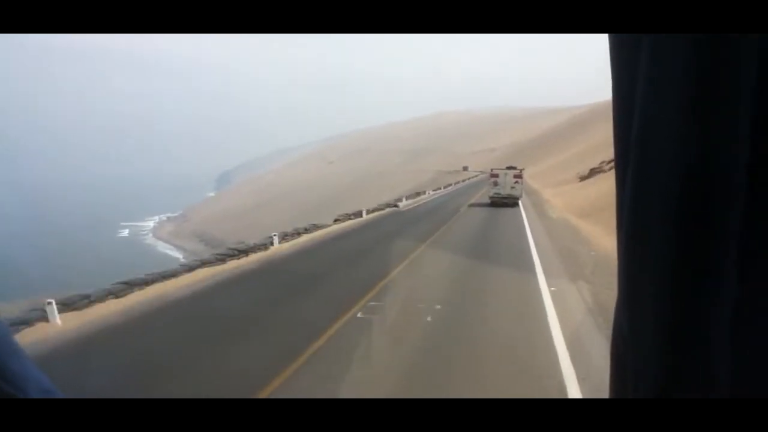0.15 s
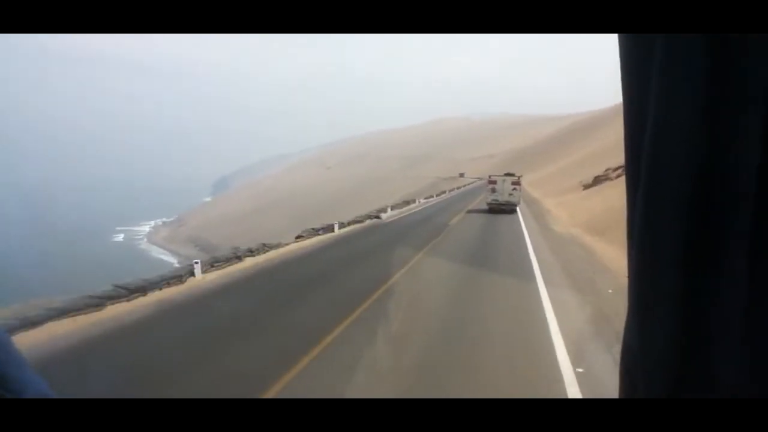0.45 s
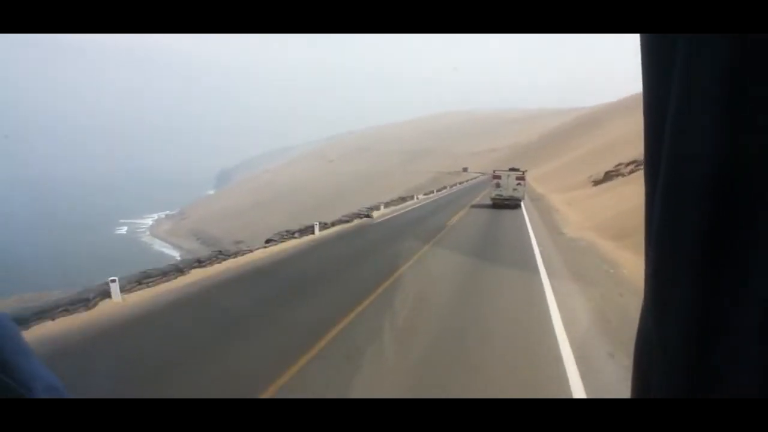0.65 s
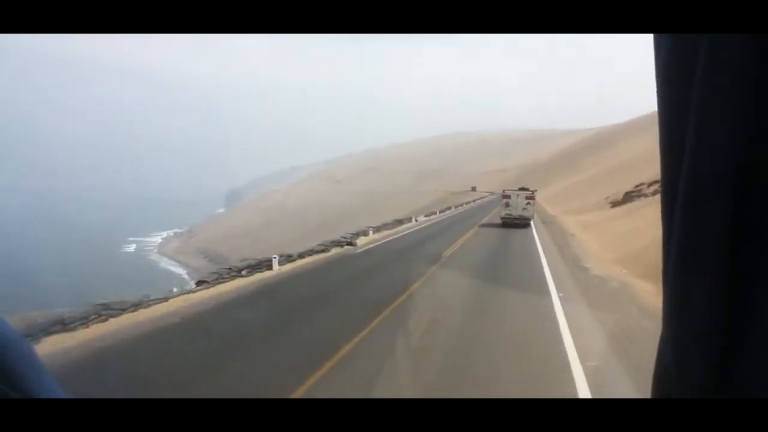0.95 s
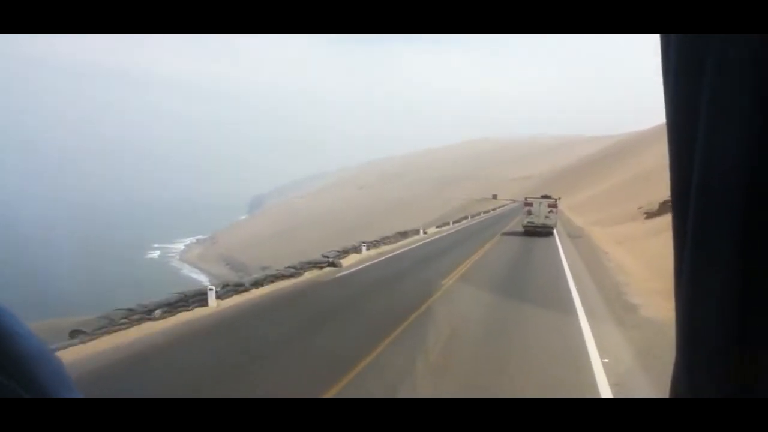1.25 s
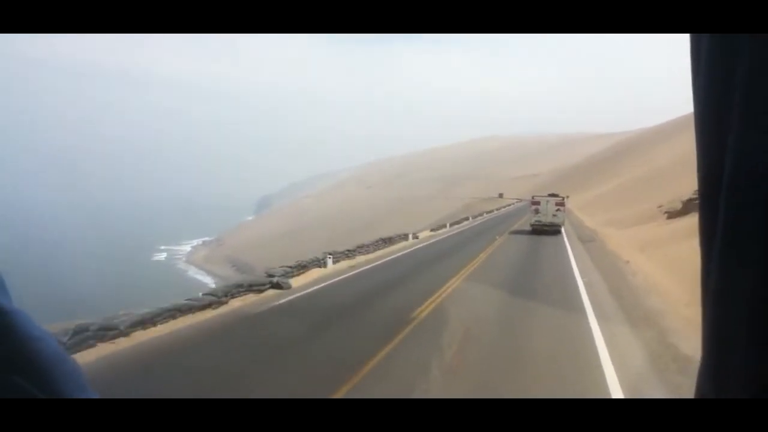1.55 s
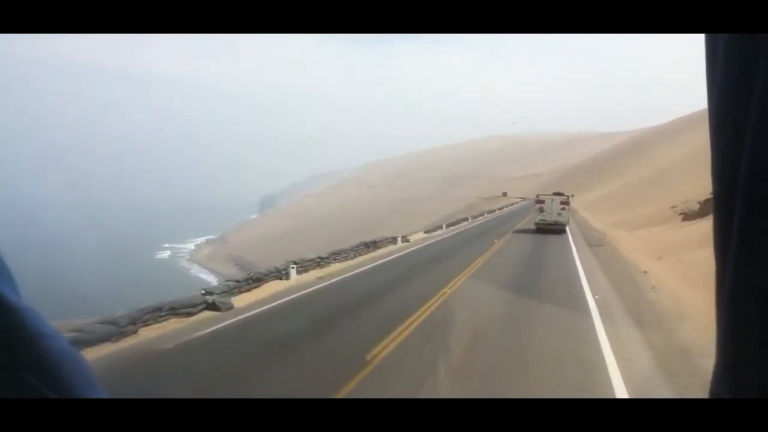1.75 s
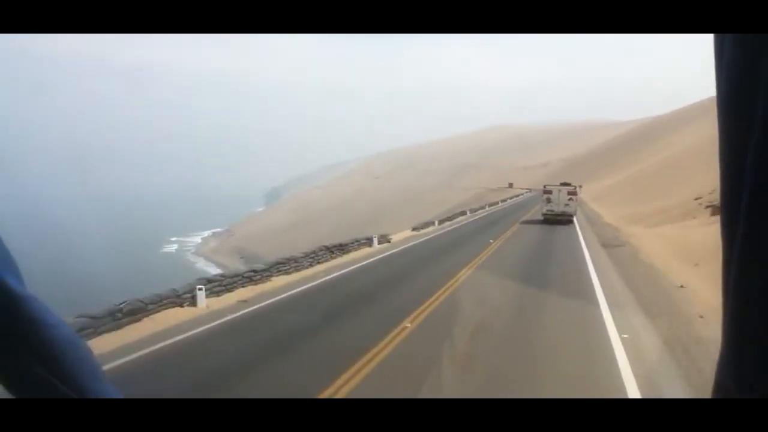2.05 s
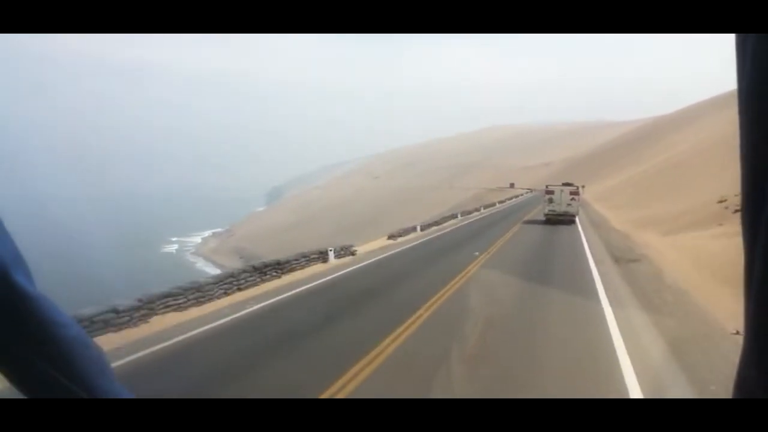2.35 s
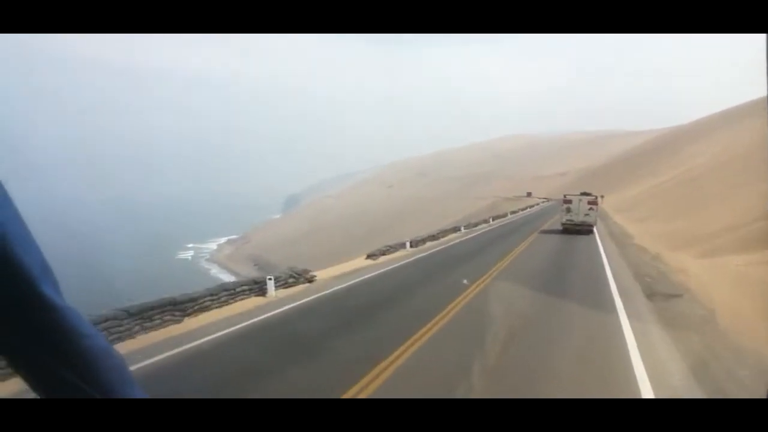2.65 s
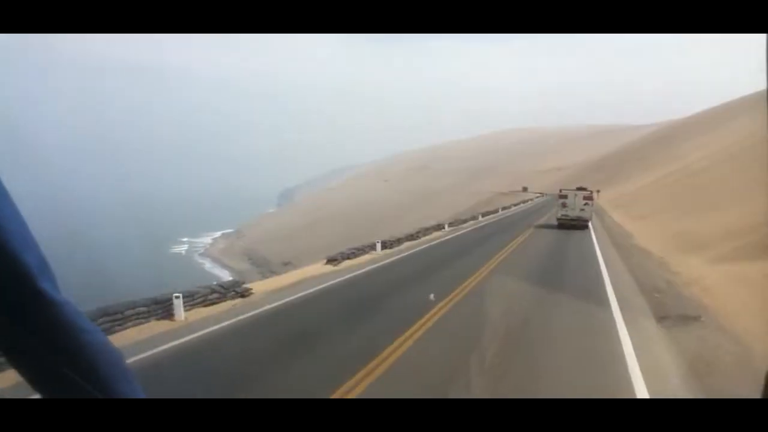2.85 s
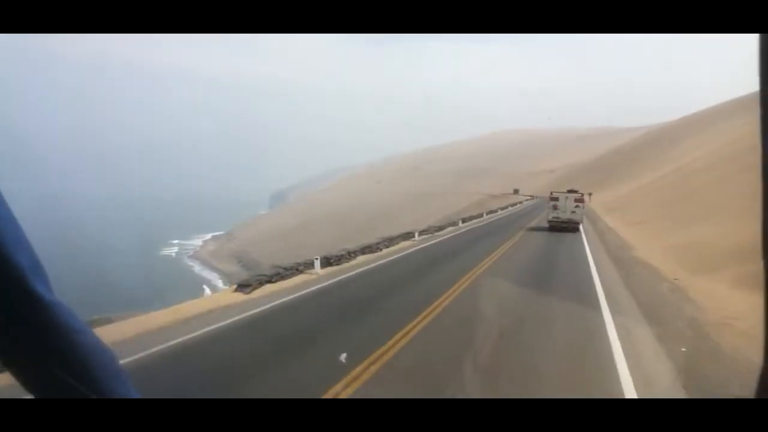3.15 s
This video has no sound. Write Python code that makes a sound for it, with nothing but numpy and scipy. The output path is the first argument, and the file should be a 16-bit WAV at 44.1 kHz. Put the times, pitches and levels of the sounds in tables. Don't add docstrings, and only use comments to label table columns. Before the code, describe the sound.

Inside a coach at steady speed, the floor drums and booms unevenly over rough asphalt. Quiet diesel drone and thin wind hiss sit behind, while sharp little rattles come and go, captured by one cabin microphone.

```python
import sys
import numpy as np
from scipy import signal
from scipy.fft import rfft, irfft, next_fast_len
from scipy.io import wavfile
from scipy.ndimage import uniform_filter1d, map_coordinates

SR = 44100
rng = np.random.default_rng(int(sys.argv[2]) if len(sys.argv) > 2 else 0)


def file_out(sig):
    cols = np.atleast_2d(sig).T
    lim = np.clip(cols, -1, 1)
    pcm = np.round(lim * 32767).astype(np.int16)
    wavfile.write(sys.argv[1], SR, pcm)


def voltage_ratio(decibels):
    exponent = np.asarray(decibels, float) / 20
    return 10 ** exponent


N = 145530


def unit(x):
    return x / np.sqrt(np.mean(x ** 2) + 1e-20)


def curve(points):
    return np.interp(np.arange(N) / SR, *np.transpose(points))


def shape(points):
    freq_hz, level_db = np.transpose(points)
    return lambda hz: voltage_ratio(np.interp(np.log(hz + 1), np.log(freq_hz + 1), level_db))


def ringing(modes):
    def response(hz):
        total = 0
        for k, (centre, width, db) in enumerate(modes):
            damping = 1j * hz * width
            total = total + (-1) ** k * voltage_ratio(db) * damping / (centre * centre - hz * hz + damping)
        return total
    return response


def filtered(x, response):
    size = next_fast_len(len(x) + 8192)
    return irfft(rfft(x, size) * response(np.fft.rfftfreq(size, 1 / SR)), size)[:len(x)]


def wobble(rate):
    knots = rng.standard_normal(int(N * rate / SR) + 4)
    return map_coordinates(knots, [np.arange(N) * rate / SR])


def rush(response, patchy_db):
    spectra = signal.stft(rng.standard_normal(N + 512), nperseg=512)[2]
    patches = uniform_filter1d(rng.standard_normal(spectra.shape), size=6, axis=0)
    patches = unit(uniform_filter1d(patches, size=10, axis=1))
    noise = signal.istft(spectra * voltage_ratio(patchy_db * patches), nperseg=512)[1][:N]
    return unit(filtered(noise, response))


# freq_hz, level_db (per Hz)
WIND_COLOUR = [(1470, -7), (2500, -14.5), (3960, -3), (4300, -3.5), (7230, -7), (10500, -11),
               (12600, -14.5), (16400, -53), (22000, -120)]
# start_s, level_db
WIND_GUSTS = [(0.0, -58.5), (0.19, -61), (0.74, -60), (0.95, -57.5), (1.07, -60), (1.76, -62),
              (2.12, -59.5), (3.3, -61)]
# start_s, level_db
FAINT_RING = [(0, -69), (1.5, -72), (2, -67), (3.3, -90)]


def wind():
    ring_noise = rush(ringing([(3850, 220, 0)]), patchy_db=0.5)
    ring_level_db = curve(FAINT_RING) + 3 * wobble(24.65)
    gust_db = curve(WIND_GUSTS)
    hiss_db = -58.5 + gust_db - gust_db.mean() + 0.41 * wobble(6.06)
    return voltage_ratio(hiss_db) * rush(shape(WIND_COLOUR), patchy_db=1.2) + voltage_ratio(ring_level_db) * ring_noise


def orders(base_hz, table, drift, flutter_db):
    phase = 2 * np.pi * np.cumsum(base_hz * (1 + drift * wobble(6))) / SR
    total = np.zeros(N)
    for order, rms_db in table:
        total += np.sqrt(2) * voltage_ratio(rms_db + flutter_db * wobble(9.09)) * np.sin(order * phase)
    return total


# order (multiple of the firing rate), level_db (rms)
FIRING_ORDERS = [(1, -36), (2, -43), (3, -43.5)]
# order (multiple of its rotation), level_db (rms)
DRIVELINE_ORDERS = [(1, -40), (2, -46.5), (3, -65)]


def engine():
    hum = orders(234.9, DRIVELINE_ORDERS, drift=0.005, flutter_db=1.5)
    return orders(70.37, FIRING_ORDERS, drift=0.04, flutter_db=3) + hum


# freq_hz, level_db
TRIM_COLOUR = [(700, -24), (1500, -9), (2500, 0.5), (4000, -1.5), (5500, 0.5), (8000, -4), (10500, -3.5),
               (13000, -12)]
# freq_hz, width_hz, level_db
KNOCKED_PANEL = [(1370, 580, 6.5), (2000, 1170, 8.5), (3170, 1350, -1)]


def contact(envelope, ring_hz, knock_db, air_db=0):
    count = len(envelope)
    noise = rng.standard_normal(count)
    unevenness = np.repeat(rng.standard_normal(count), 40)[:count]
    grit = unit(noise * voltage_ratio(2 * unevenness))
    ring = ringing([(ring_hz, 0.18 * ring_hz, 0)])
    panel = ringing(KNOCKED_PANEL)

    def response(hz):
        trim = shape(TRIM_COLOUR)(hz) * (1.08 * voltage_ratio(air_db) + 1.69 * np.abs(ring(hz)))
        return trim + voltage_ratio(knock_db + 9) * panel(hz)
    return filtered(envelope * grit, response)


# start_s, level_db (peak), ring_hz, knock_db (panel), decay_s (dying chatter)
TRIM_TICKS = [(0.063, -31, 5100, -5, 0.01), (0.1293, -40, 3750, -2, 0.009), (0.1976, -42, 3820, 0, 0.009),
              (0.2982, -39.5, 3770, -10, 0.0076), (0.5003, -38, 3760, -2, 0.009),
              (0.5324, -35, 6920, -11, 0.01), (0.5646, -39, 3770, -2, 0.009), (0.83, -40, 3900, -11, 0.009),
              (0.8954, -30, 5650, -12, 0.0077), (0.9036, -27.5, 3700, -4.5, 0.0093),
              (1.0284, -33, 9800, -6, 0.014), (1.0288, -34, 3900, -1.5, 0.0099),
              (1.288, -39, 5600, -21, 0.009), (1.935, -35.5, 5790, -9, 0.012),
              (1.9752, -33, 5570, -3.5, 0.0084), (2.4437, -36, 6000, -32, 0.009),
              (2.453, -27, 5450, -2.5, 0.007), (2.468, -56, 4120, -13, 0.009),
              (2.6445, -40, 3850, -3.5, 0.009), (2.826, -37.5, 5800, -10, 0.006),
              (2.9972, -28.5, 5660, -2, 0.0068), (1.3314, -44, 3800, -5, .009)]


def ticks(t):
    out = np.zeros(N + SR)
    tiny = [(u * N / SR, -56 - 1.2 * np.log(v), 3000 + 4000 * w, -6, 0.006) for u, v, w in rng.random((60, 3))]
    for start_s, db, ring_hz, knock_db, decay_s in list(TRIM_TICKS) + tiny:
        dying = np.exp(-t / 0.0015) + voltage_ratio(3) * np.exp(-t / decay_s)
        envelope = dying * (1 - np.exp(-t / 0.00057))
        air_db = 0.48 * min(db + 32, 0)
        out[round(start_s * SR):][:len(t)] += voltage_ratio(db - 12.5) * contact(envelope, ring_hz, knock_db, air_db)
    return out


# middle_s, level_db, half_length_s, ring_hz, knock_db (panel)
TRIM_CHATTERS = [(0.024, -61, .018, 6000, -11), (0.372, -56, 0.018, 5000, -10),
                 (0.398, -56, 0.011, 5000, -6), (0.785, -56, 0.0092, 6000, -6),
                 (.872, -60, 0.0098, 6000, -9), (0.902, -47, 0.0078, 4970, 0),
                 (0.951, -53.5, 0.021, 6070, -16), (1.071, -39.5, 0.0057, 7540, -9),
                 (1.081, -51, 0.013, 4500, -4), (2.447, -61, .004, 6000, -8.5),
                 (1.338, -50.5, 0.0086, 9300, 1), (1.473, -58, .012, 7000, -11),
                 (1.072, -47, 0.0061, 3900, -8), (1.46, -57, 0.011, 3600, 8.5),
                 (2.451, -49.5, 0.0063, 5500, -2), (2.21, -75, .1, 7000, -10),
                 (2.905, -54.5, .01, 9550, -11)]


def chatters(t):
    out = np.zeros(N + SR)
    for middle_s, db, half_s, ring_hz, knock_db in TRIM_CHATTERS:
        begin_s = max(middle_s - t[-1] / 2, 0)
        swell = np.exp(-((t + begin_s - middle_s) / half_s) ** 2 / 2)
        out[round(begin_s * SR):][:len(t)] += voltage_ratio(db) * contact(swell, ring_hz, knock_db)
    return out


# start_s, level_db
LOCKER_KNOCKS = [(.9035, -30), (2.454, -36.5), (.064, -35), (2.998, -39), (1.3, -43), (1.334, -34),
                 (.385, -37.5), (0.62, -42)]
# freq_hz, level_db, t60_s
LOCKER_MODES = [(840, 1, 0.053), (1120, 3.5, 0.033), (1744, -7.5, 0.044), (2530, -10, 0.037),
                (3700, -8, 0.025)]


def locker(t):
    out = np.zeros(N + SR)
    for start_s, db in LOCKER_KNOCKS:
        ring = np.zeros(len(t))
        for hz, level_db, t60_s in LOCKER_MODES:
            ring += voltage_ratio(level_db + rng.normal(0, 1.3) - 60 * t / t60_s) * np.sin(2 * np.pi * hz * t)
        out[round(start_s * SR):][:len(t)] += voltage_ratio(db) * ring * (1 - np.exp(-t / 0.00046))
    return out


def rattles():
    t = np.arange(SR // 10) / SR
    return (ticks(t) + chatters(t) + locker(t))[:N]


def cabin(x):
    t = np.arange(SR // 4) / SR
    tail = rng.standard_normal(len(t)) * voltage_ratio(-60 * t / 0.084) * (t > 0.003)
    return x + voltage_ratio(-9.5) * signal.fftconvolve(x, tail / np.linalg.norm(tail))[:N]


# start_s, level_db
ROAD_LEVEL = [(0, -24.5), (.5, -27.5), (.9, -24.5), (1.35, -27.5), (1.6, -27.5), (1.8, -25), (1.88, -23.5),
              (2, -29), (2.2, -23.5), (2.55, -28), (2.65, -25), (3.05, -28), (3.3, -26.5)]
# freq_hz, level_db (per Hz)
TYRE_COLOUR = [(150, -56), (260, -12), (330, -5), (520, -8), (700, -11.5), (760, -13.5), (1500, -21),
               (3500, -35.5), (5000, -51)]


def tyres():
    level_db = curve(ROAD_LEVEL)
    roar_db = -38 + 0.26 * (level_db - level_db.mean()) + 0.26 * wobble(7.1)
    return voltage_ratio(roar_db) * rush(shape(TYRE_COLOUR), patchy_db=0.7)


# freq_hz, level_db (per Hz)
FLOOR_BOOM = [(12, -34), (20, -10.5), (81, 0.5), (189, -8), (226, -9), (300, -18.5), (390, -70),
              (660, -120)]
# freq_hz, level_db
THUMP_GAP = [(45, -0.5), (62, -8), (115, -7), (150, -1), (200, -1.5), (280, -2)]
# freq_hz, width_hz, level_db
FLOOR_PANELS = [(42.4, 8.9, -1.5), (97.5, 20, -0.5), (128.8, 10.8, 2), (170.3, 13.2, -3),
                (212.8, 14.5, -3.5), (261.3, 10.7, 0)]


def floor():
    def response(hz):
        return shape(FLOOR_BOOM)(hz) * shape(THUMP_GAP)(hz) * (0.5 + np.abs(ringing(FLOOR_PANELS)(hz)))
    return voltage_ratio(curve(ROAD_LEVEL) - 2.5) * rush(response, patchy_db=-0.23)


# middle_s, level_db
# (peak), # ring_hz
ROAD_BUMPS = [(0, -21.5, 80), (0.085, -23, 74), (0.132, -21, 102), (0.227, -24.5, 77), (0.283, -21.5, 79.4),
              (0.404, -20.5, 98), (0.608, -20, 66.5), (0.672, -22, 77), (0.72, -20, 94), (0.753, -20, 80),
              (0.843, -19.5, 84.6), (0.874, -20, 99), (0.941, -19.5, 74), (0.996, -22, 111),
              (1.143, -24, 87), (1.204, -20, 87.5), (1.253, -21, 98), (1.436, -19.5, 67.4),
              (1.49, -20.5, 93), (1.52, -22.5, 83), (1.566, -26, 98), (1.598, -18.5, 81),
              (1.771, -23.5, 122), (1.877, -16.5, 102), (2.036, -22, 97), (2.084, -21, 78),
              (2.175, -18.5, 79.6), (2.245, -19, 87), (2.282, -22, 108), (2.35, -24, 89),
              (2.398, -20.5, 78.6), (2.504, -20, 98), (2.62, -21, 73), (2.651, -16.5, 84),
              (2.686, -22.5, 93), (2.737, -21, 112), (2.786, -21, 112), (2.822, -23, 98),
              (2.867, -22.5, 96), (2.96, -19.5, 106), (3.039, -20.5, 84), (3.135, -22, 106),
              (3.214, -21.5, 87)]
# middle_s, level_db (peak), ring_hz
SMALL_RIPPLES = [(.032, -25, 69), (.187, -26.5, 170), (.325, -28, 79), (.373, -29, 75), (.512, -23, 159),
                 (.554, -23, 75), (.79, -28, 90), (1.042, -24, 68.6), (1.303, -23, 105), (1.398, -26, 91),
                 (1.636, -22, 75), (1.675, -26, 89), (1.73, -22, 85), (1.9, -21.5, 127), (1.929, -25, 85.4),
                 (2.2, -24.5, 141), (2.318, -26, 74), (2.44, -28, 75), (2.85, -22, 136), (3.266, -23.5, 94)]


def bumps():
    t = np.arange(N) / SR
    rows = list(ROAD_BUMPS) + list(SMALL_RIPPLES)
    phases = np.append(np.pi, 2 * np.pi * rng.random(len(rows) - 1))
    out = np.zeros(N)
    for (middle_s, db, ring_hz), phase in zip(rows, phases):
        swell = np.exp(-((t - middle_s) / 0.01) ** 2 / 2)
        out += voltage_ratio(db) * swell * np.cos(2 * np.pi * ring_hz * (t - middle_s) + phase)
    return out


def scene():
    return (wind() + engine() + cabin(rattles()) + tyres() + floor() + bumps())[None]


def low_pass(x):
    return signal.sosfilt(signal.butter(12, 12780, fs=SR, output="sos"), x)


def record(dry):
    full, knee = 0.33, 2.7
    soft = dry[0] / (1 + np.abs(dry[0] / full) ** knee) ** (1 / knee)
    mix = filtered(soft, lambda hz: (1 - np.tanh((hz - 12500) / 120)) / 2)
    return low_pass(mix[None])


dry = scene()
out = record(dry)
file_out(out)
```